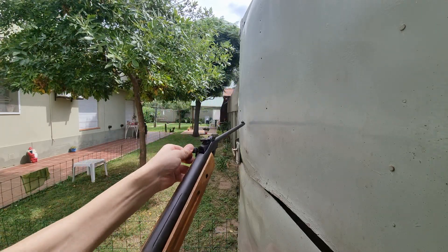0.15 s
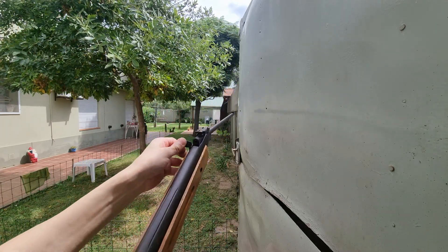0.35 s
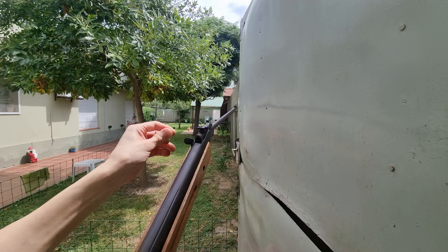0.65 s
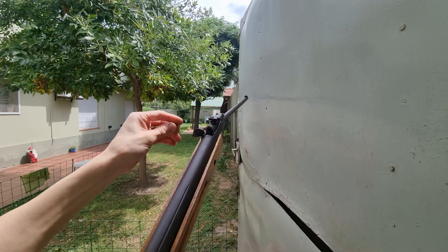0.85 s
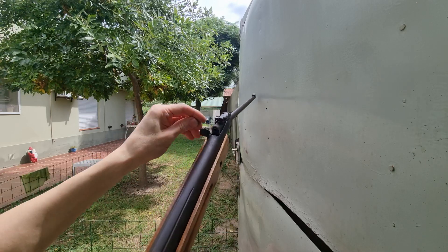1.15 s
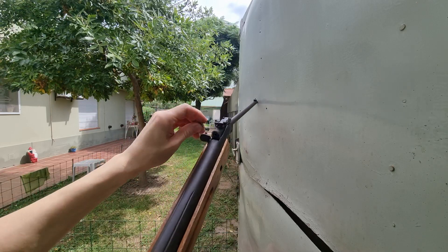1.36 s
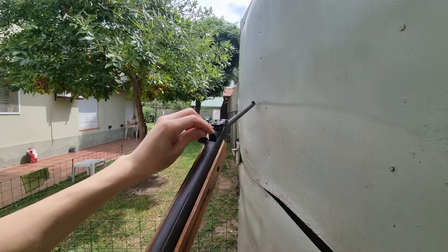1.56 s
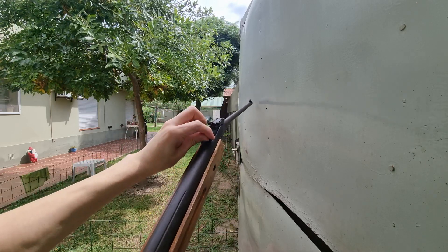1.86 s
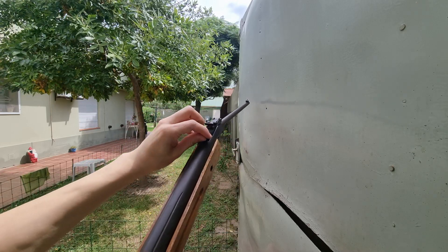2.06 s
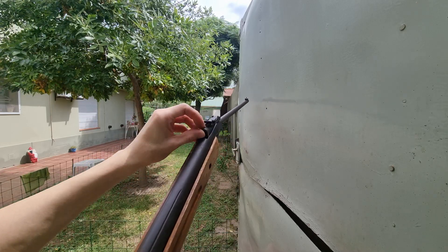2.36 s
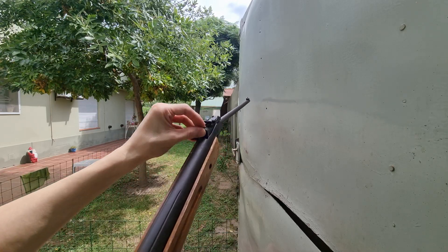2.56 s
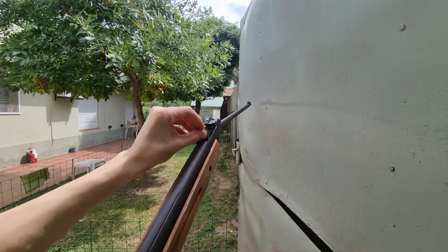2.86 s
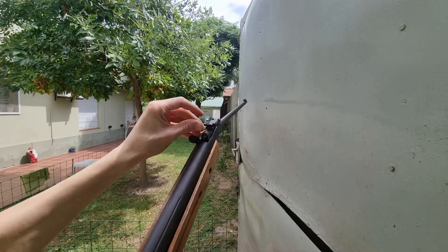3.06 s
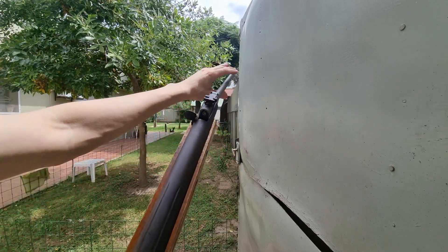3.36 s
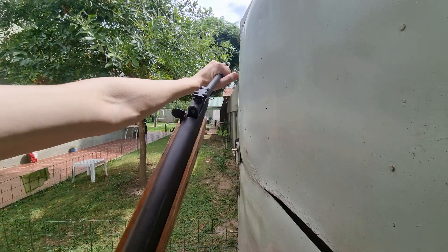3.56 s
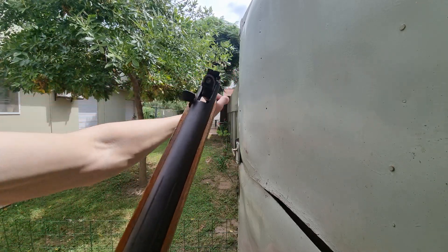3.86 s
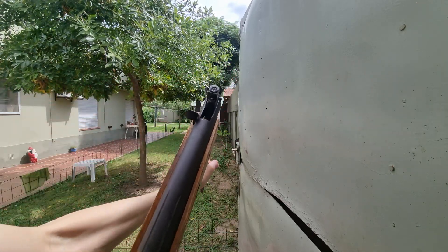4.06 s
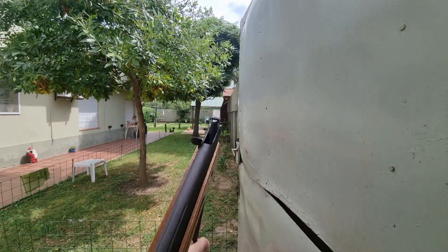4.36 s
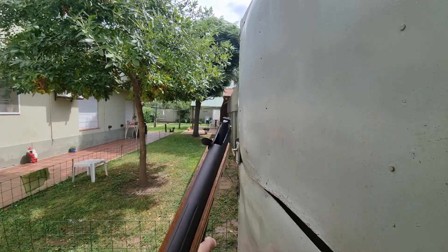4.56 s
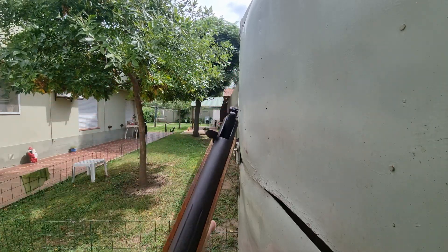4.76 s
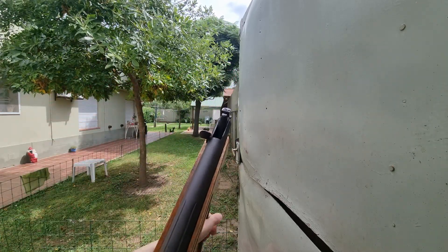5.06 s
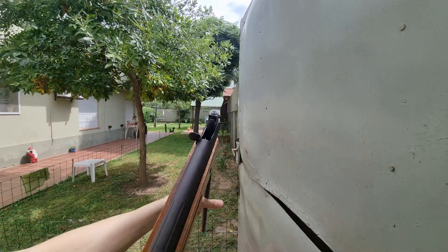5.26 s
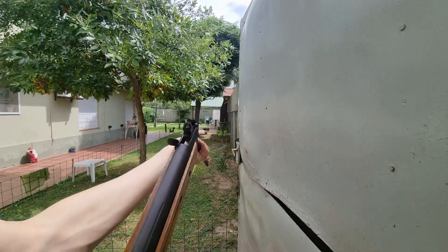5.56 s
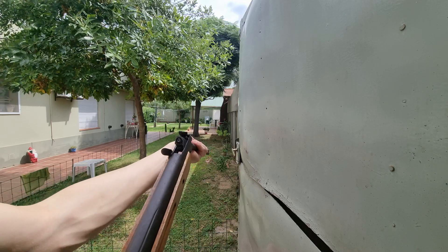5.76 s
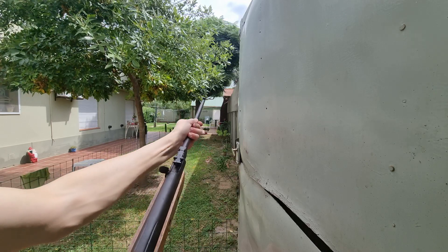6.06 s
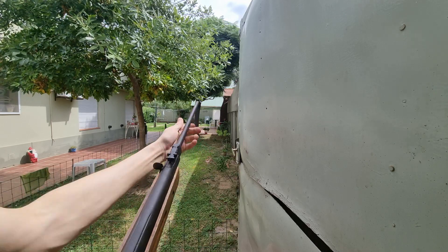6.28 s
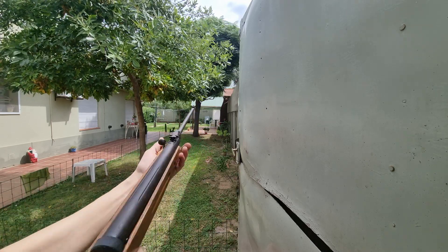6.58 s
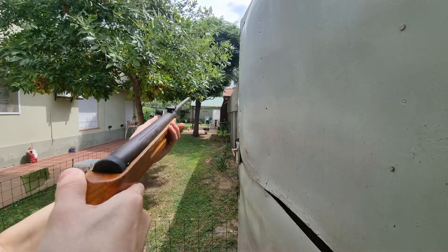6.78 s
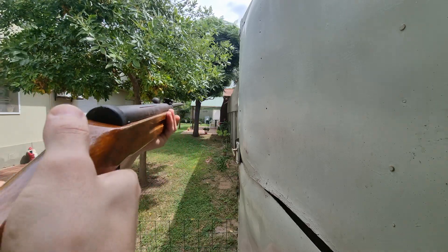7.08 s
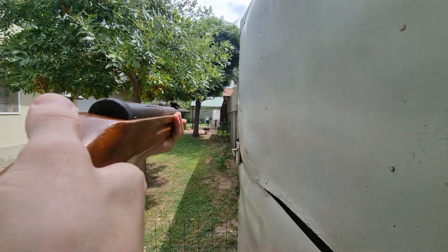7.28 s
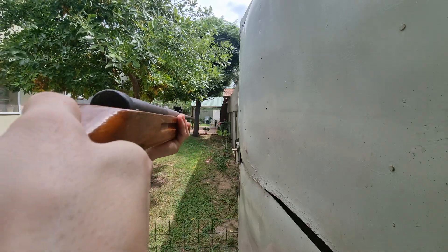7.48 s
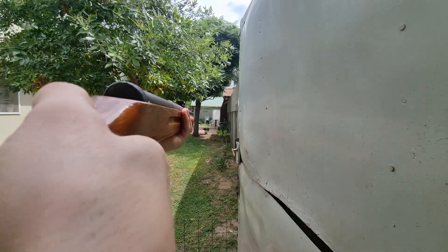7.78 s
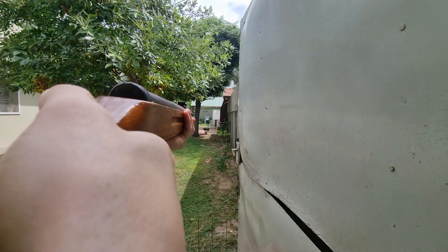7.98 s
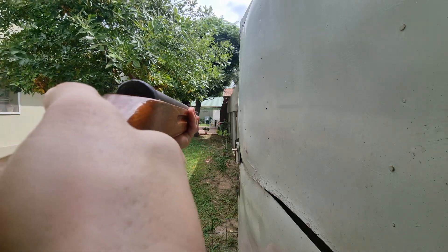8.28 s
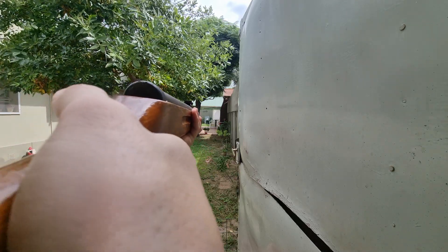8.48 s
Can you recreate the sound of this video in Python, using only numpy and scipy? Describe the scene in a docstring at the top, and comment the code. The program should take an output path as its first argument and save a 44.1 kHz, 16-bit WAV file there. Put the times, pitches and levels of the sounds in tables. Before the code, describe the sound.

A break-barrel air rifle clicks, creaks and snaps shut with a loud steel clack in a garden, where buzzing cicadas die away and birds call.

```python
"""Cicadas, two trains of tymbal clicks, buzz in a garden over open air and a low rumble of far traffic.
A break-barrel air rifle clicks as noise cracks with steel modes; a hollow sheet wall on the right booms.
Far hoarse calls and a dove's coos come in; after the buzz dies, the cocking linkage creaks in small slips,
a far engine hums and small birds whistle. The barrel snaps shut with a steel clack; palms brush the stock."""
import sys
import numpy as np
from scipy import signal
from scipy.fft import rfft, irfft, next_fast_len
from scipy.io import wavfile
from scipy.ndimage import uniform_filter1d

SR = 44100
rng = np.random.default_rng(int(sys.argv[2]) if len(sys.argv) > 2 else 0)


def store_wav(level_fs):
    """Save 16-bit WAV to argv[1]."""
    pcm = np.round(np.clip(np.atleast_2d(level_fs), -1, 1) * 32767)
    wavfile.write(sys.argv[1], SR, pcm.T.astype(np.int16))


N = 380583
TIME = np.arange(N) / SR


def undb(db):
    """Turn dB into an amplitude factor."""
    return 10 ** (np.asarray(db) / 20)


def unit(x):
    """Scale to rms 1."""
    return x / np.sqrt(np.mean(x ** 2) + 1e-30)


def lookup(hz, points):
    """Read (Hz, value) points on a log-frequency axis."""
    f, value = np.transpose(points)
    return np.interp(np.log(hz + 0.001), np.log(f), value)


def colour(x, points):
    """Give a steady sound a (Hz, dB) spectrum."""
    n = next_fast_len(len(x))
    gain = undb(lookup(np.fft.rfftfreq(n, 1 / SR), points))
    return irfft(rfft(x, n) * gain, n)[:len(x)]


def band(x, lo_hz, hi_hz, order=2):
    """Band-pass with a Butterworth filter."""
    edges_hz = [lo_hz, min(hi_hz, SR / 2 - 100)]
    return signal.sosfilt(signal.butter(order, edges_hz, "band", fs=SR, output="sos"), x)


def noise(n=N):
    """White noise of rms 1."""
    return rng.standard_normal(n)


def fade(t, t60_s):
    """Exponential decay, 60 dB in t60_s."""
    return np.exp(-np.log(1000) * t / max(t60_s, 1e-3))


def walk(rate_hz):
    """Smooth chance with a spread of 1."""
    k = int(SR / rate_hz)
    steps = np.repeat(noise(N // k + 1), k)
    return unit(uniform_filter1d(steps, k)[:N])


def swell(peak_s, rise_s, fall_s, db):
    """Gain that climbs 20 dB during the rise and sinks 20 dB during the fall."""
    before = (peak_s - TIME) / max(rise_s, .005)
    after = (TIME - peak_s) / max(fall_s, .005)
    return undb(db - 20 * np.maximum(before, after))


def ring(t, modes, length=1):
    """Decaying modes, each struck with a random sign; length scales every t60."""
    out = 0
    for hz, db, t60_s in modes:
        mode = np.sin(2 * np.pi * hz * t) * fade(t, length * min(t60_s, 1.3))
        out = out + rng.choice([-1, 1]) * undb(db) * mode
    return out


def add(out, s, x):
    """Mix x into out from second s on."""
    i = max(int(s * SR), 0)
    out[i:i + len(x)] += x[:len(out) - i]


def on_right(x, left_db):
    """The left port is shaded from the source."""
    return np.array([undb(left_db) * x, x])


def yard(x, t60_s, wet_db):
    """Scatter from walls and leaves; the middle treble lingers longest."""
    t = np.arange(SR) / SR
    tail = band(noise(SR), 300, 15000) * fade(t, 0.53 * t60_s)
    tail += undb(-10) * band(noise(SR), 2800, 7800) * fade(t, t60_s)
    tail *= 1 - np.exp(-t / 0.0024)
    return undb(wet_db) * signal.fftconvolve(x, tail / np.linalg.norm(tail))[:N]


def tymbal_clicks(rate_hz, scatter_ms):
    """A train of sharp clicks whose timing loosens as the song goes on."""
    cycles = np.cumsum(rate_hz) / SR
    at = np.interp(np.arange(2, int(cycles[-1])), cycles, np.arange(N))
    at += noise(len(at)) * scatter_ms[at.astype(int)] * SR / 1000
    # sinc taps place each click between samples
    taps = at.astype(int)[:, None] + np.arange(-7, 9)
    out = np.zeros(N)
    np.add.at(out, np.clip(taps, 0, N - 1), np.sinc(taps - at[:, None]))
    return unit(out)


SONG_DB, SONG_SWELL_DB, SONG_SWELL_S = -54.5, 3, 1.2  # starts 3 dB low, full after 1.2 s
# release begins at SONG_FADES_AT_S; the body's release adds to the song's
SONG_FADES_AT_S, SONG_RELEASE_DB_PER_S, BODY_EXTRA_RELEASE_DB_PER_S = 3.56, 52, 60
STEADY_HZ, RATE_WANDER, SHIMMER_DB = 317.4, .0014, 2.0  # wander as a share of the rate
SCATTER_START_MS, SCATTER_DOUBLES_S = 0.009, 0.8
# click rate of the easing singer: (time [s], rate [clicks/s])
EASING_RATE = [(0, 341), (.65, 339), (1, 333), (1.5, 328), (3.6, 329)]
# abdomen resonances: (centre [Hz], width [Hz], level [dB])
TYMBAL_MODES = [(3110, 370, 3.5), (4574, 400, 10), (5540, 370, 7.5), (6960, 260, -12)]
# partials that stand out: (singer [0 steady, 1 easing], multiple of click rate [-], level [dB])
WHINE_PARTIALS = [(0, 5, -24), (0, 6, -20), (0, 7, -25), (0, 10, -6), (0, 11, -11), (0, 12, -7),
                  (1, 6, -22), (1, 10, -11), (1, 13, -7), (1, 14, -10)]
# buzz spectrum: (frequency [Hz], level [dB])
BUZZ_SPECTRUM = [(1350, -41), (2300, -24.5), (2410, -70), (2720, -71), (3000, -5), (3070, -3), (3640, -9.5),
                 (4050, -2), (4530, 8.5), (5150, -8.5), (6200, 2), (6670, -15.5), (7400, -9), (8420, -18.5),
                 (10500, -13.5), (11600, -9.5), (15800, -19.5)]
# higher note that ends the song: (peak time [s], rise [s], fall [s], level [dB])
LAST_NOTE = (3.68, .3, .2, -60)
# its band: (low edge [Hz], high edge [Hz])
LAST_NOTE_BAND = (4750, 5700)


def cicadas():
    """Two click trains ring the insects' bodies; foliage smears the clicks into a whining hiss."""
    bases_hz = STEADY_HZ, np.interp(TIME, *np.transpose(EASING_RATE))
    rates_hz = [hz * (1 + RATE_WANDER * walk(6)) for hz in bases_hz]
    scatter_ms = SCATTER_START_MS * 2 ** (np.minimum(TIME, SONG_FADES_AT_S) / SCATTER_DOUBLES_S)
    dying_s = np.maximum(TIME - SONG_FADES_AT_S, 0)
    steady, easing = (tymbal_clicks(hz, scatter_ms) for hz in rates_hz)
    # the easing singer stresses every third click
    easing = easing + tymbal_clicks(rates_hz[1] / 3, scatter_ms)
    steady = band(yard(steady, t60_s=.12, wet_db=3), 2500, 4000, order=4)
    easing = band(yard(easing, t60_s=.2, wet_db=0), 3300, 16000, order=2)
    # smeared clicks, 50 ms early, over a hiss
    drive = np.roll(unit(steady + .6 * easing), -SR // 20) + undb(-9) * noise()

    # the abdomen's resonances give out before the rest of the song
    body = 0
    for hz, width_hz, db in TYMBAL_MODES:
        mode = band(drive, hz - width_hz / 2, hz + width_hz / 2, order=1)
        body = body + undb(db + SHIMMER_DB * walk(14)) * mode
    body = unit(band(body, 3080, 6520, order=4)) * undb(-1.5 - BODY_EXTRA_RELEASE_DB_PER_S * dying_s)

    # partials sing out while the clicks are evenly timed
    whine = 0
    for singer, multiple, db in WHINE_PARTIALS:
        hz = multiple * rates_hz[singer]
        tone = np.sin(2 * np.pi * np.cumsum(hz + 5 * walk(30)) / SR)
        evenness = np.exp(-(2 * np.pi * hz * scatter_ms / 1000) ** 2 / 2)
        whine = whine + tone * evenness * undb(db + 2.5 * walk(5))

    buzz = unit(colour(drive, BUZZ_SPECTRUM)) * undb(4.5)
    level_db = SONG_DB - SONG_SWELL_DB * np.maximum(1 - TIME / SONG_SWELL_S, 0)
    level_db = level_db - SONG_RELEASE_DB_PER_S * dying_s + 0.46 * walk(25.45)
    song = (body + whine + buzz) * undb(level_db)
    song = song + unit(band(drive, *LAST_NOTE_BAND)) * swell(*LAST_NOTE)
    return np.array([undb(-15.0) * band(song, 5040, 6600), song])


AIR_DB = -57  # rms before the balance between ports
# open-air spectrum: (frequency [Hz], level [dB])
AIR_SPECTRUM = [(15, -30.5), (25, -7), (102, -0.5), (152, -1), (235, -7.5), (371, -10.5), (414, -12),
                (981, -22.5), (1180, -21.5), (2090, -30), (3130, -29), (5820, -40.5), (8970, -48.5),
                (12700, -44), (15800, -44.5)]
# balance between ports: (frequency [Hz], left minus right [dB])
AIR_PORT_BALANCE = [(60, -4), (110, -0.5), (200, 7), (380, 6), (700, 11), (1290, 8), (2380, 0),
                    (4400, -8.5), (8120, -23.5), (15000, -11.5)]


def open_air():
    """Coloured noise, unrelated at the two ports, gently unsteady."""
    level = undb(AIR_DB) / np.std(colour(noise(), AIR_SPECTRUM))
    ports = []
    for side in (1, -1):
        # split the power between the ports
        share = [(hz, 20 * np.log10(np.sqrt(2 / (1 + undb(-2 * side * db))))) for hz, db in AIR_PORT_BALANCE]
        air = colour(colour(noise(), AIR_SPECTRUM), share)
        ports.append(level * air * undb(1.1 * walk(4)))
    return np.array(ports)


TRAFFIC_HALF_WIDTH = .12  # share of the pitch
# rumbles that rise and ebb: (peak time [s], rise [s], fall [s], pitch [Hz], level [dB])
TRAFFIC_RUMBLES = [(1, .9, 1.33, 63.8, -54), (3.25, 0.38, 0.29, 115, -55.5), (5.1, 0.45, 0.47, 53.7, -57),
                   (6.45, 0.49, 0.7, 54.5, -55.5), (7.55, 0.95, 0.66, 52.8, -53)]


def traffic():
    """Far traffic: narrow bands of low noise that swell and ebb."""
    out = np.zeros(N)
    for s, rise_s, fall_s, hz, db in TRAFFIC_RUMBLES:
        rumble = unit(band(noise(), hz * (1 - TRAFFIC_HALF_WIDTH), hz * (1 + TRAFFIC_HALF_WIDTH)))
        out += rumble * swell(s, rise_s, fall_s, db)
    return out


CLICK_LEFT_DB = -23  # left minus right, before scatter
# steel contacts: (time [s], level [dB, before -4 dB], low band re middle [dB],
# high band re middle [dB], ring t60 [s])
STEEL_CONTACTS = [(0.0845, -38.5, -1, -5.5, 0.18), (0.136, -27, 7.5, -1.5, 0.052),
                  (0.1576, -46, 17, 11.5, 0.033), (0.179, -33.5, 6.5, -5, 0.022), (0.196, -45, 11, 1, 0.24),
                  (2.73, -70, -5, 18, 0.05), (3.8351, -59.5, 15, -0.5, 0.05),
                  (4.0105, -50.5, 13, -1, 0.016), (4.137, -75, -7, 16, 0.05), (4.364, -42, 3.5, -19, 0.11),
                  (4.4193, -33, -1.5, 2, 0.031), (4.457, -39.5, 7, 0.5, 0.026), (4.793, -44, 7, -4, 0.023),
                  (5.156, -65, 8, 12, 0.035), (5.2658, -50, -2, -7, 0.074), (5.4, -48.5, 5, -0.5, 0.054),
                  (5.412, -49, 2, -14, 0.098), (5.876, -45.5, 4, -30, 0.053),
                  (5.922, -32, -1, -10.5, 0.037), (5.9571, -32.5, 2.5, -6, 0.056),
                  (6.0137, -12, -4, 2, 0.03), (6.0201, -21, 1.5, 4.5, 0.13), (6.555, -61, 12, -7, 0.04),
                  (6.6309, -48, -1, -14, 0.086), (7.514, -50, -15.5, -28, 0.011)]
# barrel and action modes: (frequency [Hz], level [dB], t60 [s, for a contact of t60 0.24 s])
STEEL_MODES = [(829, -15.5, 0.18), (1090, -6, .15), (1400, -12, 0.18), (1520, -13, 0.2216),
               (1657, -6.5, .18), (2440, -14.5, 0.22), (3135, -10, 0.74), (3230, -18.5, 0.19),
               (3660, -15, 0.58), (4450, -10.5, 0.13), (4610, -17, 0.14), (5317, -11, .16),
               (5660, -8, 0.11), (6850, -7, 0.091), (8380, -9, 0.22), (10500, -11.5, .25),
               (10173, -5.5, 0.36), (11840, -7.5, 0.26), (12550, -6.5, 0.37), (13890, -2.5, 0.28)]
# crack spectrum: (frequency [Hz], level [dB])
STEEL_SPECTRUM = [(400, -16.5), (700, -3), (1000, -7), (1400, 2.5), (2100, -6.5), (2700, -1), (3600, -2.5),
                  (4600, -7), (7200, -1.5), (8600, -3.5), (11300, -7), (12400, -2), (15800, -13.5)]
# light contacts ring only the small parts, hard ones the whole barrel: (level [dB], lowest frequency [Hz])
CONTACT_REACH = [(-42, 1100), (-22, 450)]


def action():
    """Each contact is a hard crack, then the ring of barrel and action, scattered by the garden."""
    out, t, head = np.zeros((2, N)), np.arange(SR // 3) / SR, SR // 200
    for s, db, low_db, high_db, t60_s in STEEL_CONTACTS:
        crack = unit(colour(noise(len(t)), STEEL_SPECTRUM)) * (fade(t, t60_s) + 0.62 * fade(t, 0.045))
        steel = ring(t, STEEL_MODES, length=t60_s / 0.24)
        x = crack + undb(-5) * steel / np.std(steel[:head])
        low = band(x, np.interp(db, *np.transpose(CONTACT_REACH)), 2436)
        middle, high = band(x, 3225, 5160), band(x, 5000, 16000)
        hit = 0
        # alternate signs keep neighbouring bands from cancelling where they meet
        for sign, gain_db, part in ((1, low_db, low), (-1, 0, middle), (1, high_db, high)):
            hit = hit + sign * undb(db + gain_db - 4.0) * part / np.std(part[:head])
        add(out[0], s, undb(CLICK_LEFT_DB) * hit)
        add(out[1], s, hit)
    # each port hears its own scatter
    left = out[0] + yard(out[0], t60_s=0.24, wet_db=-8.5)
    right = out[1] + yard(out[1], t60_s=0.46, wet_db=-13.5)
    # the shaded left port loses the top octave
    return np.array([colour(left, [(3000, 1.5), (5500, 5), (7700, 5), (8600, -9)]), right])


# bumps: (time [s], level [dB, relative], share of full ring [-], panel modes re crowd [dB],
# favoured pitch [Hz], left minus right [dB], contact time [s])
WALL_BUMPS = [(0.137, -12.5, 0.95, -4, 385, -24, 0.0003), (0.226, -28.5, 0.79, -0.5, 89, -25, 0.0065),
              (0.384, -42.5, 0.7, 2.5, 310, -20, 0.011), (0.42, -52.5, 0.52, -7, 715, -24, 0.0081),
              (1.361, -39.5, 0.87, -4, 250, -21, 0.001), (6.015, -49.5, 0.29, -16.5, 261.3, -7, 0.00098),
              (6.643, -46, 0.091, -14, 301, -15, 0.0013)]
# strong panel modes: (frequency [Hz], level [dB], t60 at full ring [s])
WALL_MODES = [(70, 7, 0.6), (94.3, -2, 1.3), (116, -7.5, 1.1), (141, -2, 0.5), (231, 2, 0.5),
              (305, 0, 0.42), (359, 9, 0.23), (462, 0, 0.25), (539, -3, 0.28), (686, -2, 0.28),
              (917, -9, 0.22)]
# spectrum of the weak modes: (frequency [Hz], level [dB])
WALL_SPECTRUM = [(18, -35), (30, -11), (90, 0), (164, -3.5), (227, -7.5), (367, -8.5), (749, -13.5),
                 (891, -15.5), (1340, -29.5), (2340, -40.5), (3000, -34), (3900, -76.5), (6600, -120)]
# decay of the weak modes: (frequency [Hz], t60 at full ring [s])
WALL_DECAY = [(40, 1.2), (120, 1.15), (300, 0.46), (700, 0.33), (1500, 0.16)]


def wall():
    """A big loose panel: a few strong modes in a crowd of weak ones, whose deepest last longest."""
    out, t, head = np.zeros((2, N)), np.arange(SR) / SR, SR // 40
    centres_hz = 35 * 2 ** (np.arange(14) / 2)
    for s, db, length, modes_db, favoured_hz, pan_db, contact_s in WALL_BUMPS:
        crowd = 0
        for hz in centres_hz:
            # half an octave of noise, past the filter's start-up
            weak = unit(band(noise(SR + head * 8), hz / 2 ** (1 / 4), hz * 2 ** (1 / 4)))[-SR:]
            level = np.sqrt(hz) * undb(lookup(hz, WALL_SPECTRUM))
            crowd = crowd + weak * level * fade(t, length * lookup(hz, WALL_DECAY))
        modes = ring(t, WALL_MODES, length)
        boom = crowd / np.std(crowd[:head]) + undb(modes_db) * modes / np.std(modes[:head])
        # the place of the blow favours some modes
        boom = boom + 1.5 * band(boom, .85 * favoured_hz, 1.15 * favoured_hz, order=1)
        boom *= undb(db - 2.5) * (1 + 0.79 * fade(t, 0.053))
        boom *= 1 - np.exp(-(t / contact_s) ** 2)
        add(out[0], s, undb(pan_db) * boom)
        add(out[1], s, boom)
    return out


def whistle(length_s, start_hz, end_hz, warble, arch_hz=0):
    """One gliding note with a burr, rounded at both ends."""
    u = np.linspace(0, 1, int(length_s * SR))
    hz = start_hz + (end_hz - start_hz) * u + arch_hz * np.sin(np.pi * u)
    hz = hz * (1 + warble * walk(300)[:len(u)])
    return np.sin(2 * np.pi * np.cumsum(hz) / SR) * 2 * np.sqrt(u * (1 - u))


CHIRP_BURR, BURR_FULL_S = 0.035, 0.1  # wobble as a share of the pitch; shorter notes are purer
COO_HZ, COO_WARBLE, COO_ARCH_HZ = 370, 0.011, 12.43  # warble as a share of the pitch
LEAVES_T60_S, BIRD_DIRECT_DB = .09, -5
# a far bird's hoarse calls: (time [s], length [s], level before scatter [dB])
HOARSE_CALLS = [(0.665, 0.11, -68), (1.885, 0.12, -69), (3.13, 0.09, -71), (3.38, 0.16, -68.5)]
# their spectrum: (frequency [Hz], level [dB])
HOARSE_SPECTRUM = [(1350, -27), (1600, -7), (1820, -1), (1970, -6), (2100, -5), (2500, -30.5)]
# the dove's coos: (time [s], length [s], level [dB])
DOVE_COOS = [(1.603, 0.48, -63), (2.598, 0.36, -65), (7.046, 0.693, -60.5), (8.219, 0.48, -57.5)]
# small birds: (time [s], length [s], start [Hz], end [Hz], mid arch [Hz], level before scatter [dB])
BIRD_CHIRPS = [(4.667, 0.17, 3140, 3250, 132.5, -60), (5.131, 0.038, 3204, 3410, 224, -54),
               (5.19, 0.074, 3340, 3280, 105, -59.5), (6.375, 0.052, 3095, 3114, 304.5, -61.5),
               (6.442, 0.065, 3110, 3030, 202.5, -60), (7.077, 0.03, 3360, 3040, 125.5, -61.5),
               (7.205, 0.045, 3000, 2554, 60.5, -66), (7.283, 0.093, 2900, 2830, 36.5, -66),
               (7.419, 0.024, 3284, 2760, 172, -57.5), (7.479, 0.02, 3130, 2550, 99, -59.5),
               (7.557, 0.027, 3370, 2930, 149, -55.5), (7.604, 0.026, 3300, 2760, 103.5, -60.5),
               (7.687, 0.135, 2890, 2863, 451.5, -58.5), (8.152, 0.031, 3053, 3060, 291.5, -50.5),
               (8.184, 0.066, 3120, 1934, -110, -63.5), (8.328, 0.035, 4140, 4110, 19.5, -69),
               (8.427, 0.025, 2920, 2460, 90, -63.5), (8.485, 0.024, 2914, 2660, 120, -64.5),
               (8.541, .03, 2990, 2770, 61, -68.5)]


def birds():
    """Hoarse noise calls and far whistles scattered by the trees, and the dove's low coos."""
    calls, coos = np.zeros((2, N))
    for s, length_s, db in HOARSE_CALLS:
        n = int(length_s * SR)
        rasp = unit(colour(noise(n), HOARSE_SPECTRUM) * np.sqrt(np.hanning(n)))
        add(calls, s, undb(db) * rasp)
    for s, length_s, db in DOVE_COOS:
        add(coos, s, undb(db) * whistle(length_s, COO_HZ, COO_HZ, COO_WARBLE, COO_ARCH_HZ))
    for s, length_s, start_hz, end_hz, arch_hz, db in BIRD_CHIRPS:
        burr = CHIRP_BURR * min(length_s / BURR_FULL_S, 1)
        add(calls, s, undb(db) * whistle(length_s, start_hz, end_hz, burr, arch_hz))
    near = undb(BIRD_DIRECT_DB) * calls + yard(calls, t60_s=LEAVES_T60_S, wet_db=-1.5)
    scattered = near + yard(calls, t60_s=0.62, wet_db=-2.5)
    return on_right(coos + scattered, left_db=-35)


def friction(strokes, spectrum, slips_per_s, scatter_db, grain_share, judder_db):
    """Tiny slips of uneven size, each ringing briefly, over a juddering rub that swells with each stroke."""
    sizes = undb(scatter_db * np.minimum(rng.exponential(size=N), 3))
    slips = (rng.random(N) < slips_per_s / SR) * sizes
    t = np.arange(SR // 20) / SR
    slips = signal.fftconvolve(slips, noise(len(t)) * fade(t, 0.024))[:N]
    effort = np.max([swell(*stroke) for stroke in strokes], axis=0)
    rub = unit(colour(grain_share * unit(slips) + noise(), spectrum))
    return rub * effort * undb(judder_db * walk(45))


# linkage under the spring's load: (peak time [s], rise [s], fall [s], level before +5.5 dB [dB])
LINKAGE_STROKES = [(3.95, 0.19, 0.72, -67.5), (4.09, 0.37, 0.57, -65.5), (4.395, 0.089, 0.1, -55.5),
                   (5.25, 0.25, .2, -67), (5.42, 0.27, 0.32, -63), (5.89, 0.17, 0.047, -57.5),
                   (6.01, 0.025, 0.049, -46.5)]
# creak spectrum: (frequency [Hz], level [dB])
CREAK_SPECTRUM = [(350, -38.5), (650, -5), (950, -17.5), (1220, -0.5), (1500, -5), (1950, -6),
                  (2700, -14.5), (3800, -13), (5500, -17), (9000, -21), (15000, -30.5)]


def linkage():
    """The cocking linkage grates under the spring's load."""
    return undb(5.5) * friction(LINKAGE_STROKES, CREAK_SPECTRUM, slips_per_s=260, scatter_db=3,
                                grain_share=1, judder_db=2.6)


ENGINE_WANDER, ENGINE_FLUTTER_DB = .02, 1.5  # wander as a share of the rate
# engine slowly gathering speed: (time [s], firing rate [Hz], level [dB])
ENGINE_RUN = [(3.85, 87, -73), (4.2, 88, -46.5), (4.6, 92, -54), (4.82, 95, -65), (5.05, 98, -50),
              (5.3, 99, -63.5), (6.4, 103, -55), (7.4, 109, -71.5)]


def engine():
    """A wavering hum on the firing rate of a far engine."""
    s, hz, db = np.transpose(ENGINE_RUN)
    rate_hz = np.interp(TIME, s, hz) * (1 + ENGINE_WANDER * walk(17))
    level_db = np.interp(TIME, s, db, left=-120, right=-120) + ENGINE_FLUTTER_DB * walk(12)
    return unit(np.sin(2 * np.pi * np.cumsum(rate_hz) / SR)) * undb(level_db)


SLIPS_PER_S, SLIP_SCATTER_DB = 420, 4
# loaded hinge sticks and jerks free: (time [s], length [s], pitch [Hz], level [dB])
HINGE_JERKS = [(3.884, 0.04, 1400, -59.5), (3.953, 0.021, 1400, -59), (4.015, 0.026, 1330, -51),
               (4.062, 0.021, 1370, -51), (4.098, 0.011, 1560, -60), (4.153, 0.027, 1380, -61),
               (4.218, .016, 1400, -57.5), (5.075, 0.012, 1680, -62.5), (5.367, 0.028, 1600, -53.5),
               (5.433, 0.035, 1560, -53.5), (5.491, 0.028, 1840, -60.5), (5.874, 0.032, 1630, -52)]
# hinge resonances: (multiple of pitch [-], width as a share [-], level [dB])
HINGE_MODES = [(1, 0.085, 4), (1.37, 0.055, -14), (2.3, .4, -18)]


def hinge():
    """Each jerk is a quick run of uneven slips that ring the hinge's resonances."""
    out = np.zeros(N)
    for s, length_s, hz, db in HINGE_JERKS:
        n = int(length_s * SR)
        at = np.cumsum(rng.uniform(.5, 1.5, 64)) * SR / SLIPS_PER_S
        at = (at - at[0]).astype(int)
        slips = np.zeros(n + SR // 20)
        slips[at[at < n]] = undb(SLIP_SCATTER_DB * noise(len(at)))[at < n]
        jerk = 0
        for k, width, gain_db in HINGE_MODES:
            mode = band(slips, k * hz * (1 - width / 2), k * hz * (1 + width / 2), order=1)
            jerk = jerk + undb(gain_db) * unit(mode)
        jerk = band(jerk, 670, 5100)
        add(out, s, undb(db) * jerk / np.std(jerk[:n]))
    return out


# dull low knocks: (time [s], pitch [Hz], level [dB], t60 [s], left minus right [dB])
DULL_KNOCKS = [(4.195, 81, -49, 0.11, 13), (4.457, 770, -45, 0.064, -20), (4.553, 79, -59, 0.17, 25),
               (4.793, 740, -37, 0.047, -14), (5.4, 690, -53, 0.29, -24)]


def dull_knocks():
    """Handling bumps near the left port, low thuds under the clicks: decaying noise around a pitch."""
    out, t = np.zeros((2, N)), np.arange(SR // 2) / SR
    for s, hz, db, t60_s, pan_db in DULL_KNOCKS:
        knock = undb(db) * unit(band(noise(len(t)), hz / 1.4, hz * 1.4)) * fade(t, t60_s)
        add(out[0], s, undb(pan_db) * knock)
        add(out[1], s, knock)
    return out


# steel squeaks as the joint slides: (time [s], length [s], pitch [Hz], level [dB])
JOINT_SQUEAKS = [(5.52, 0.16, 2490, -59.5), (5.956, 0.051, 12050, -33)]


def squeaks():
    """The sliding steel joint squeaks: short tones of unsteady pitch."""
    out = np.zeros(N)
    for s, length_s, hz, db in JOINT_SQUEAKS:
        t = np.arange(int(length_s * SR)) / SR
        phase = 2 * np.pi * np.cumsum(hz * (1 + 0.017 * walk(900)[:len(t)])) / SR
        envelope = np.sqrt(np.sin(np.pi * t / length_s)) * fade(t, 3 * length_s)
        add(out, s, undb(db) * np.sin(phase) * envelope)
    return out


# palms on the stock: (peak time [s], rise [s], fall [s], level before +6.5 dB [dB])
PALM_SLIDES = [(6.55, 0.087, .12, -67.5), (6.63, 0.18, 0.087, -62), (6.84, 0.11, 0.15, -54.5),
               (6.93, 0.081, 0.088, -52.5), (7.52, 0.11, 0.12, -65)]
# slide spectrum: (frequency [Hz], level [dB])
SLIDE_SPECTRUM = [(470, -37), (800, -15), (1110, 2.5), (1320, 0.5), (1440, 1), (2790, -1), (5400, -0.5),
                  (5970, -6.5), (12800, -7), (15800, -7)]


def palms():
    """Palms brush the stock: dense fine slips over a rub."""
    return undb(6.5) * friction(PALM_SLIDES, SLIDE_SPECTRUM, slips_per_s=600, scatter_db=3,
                                grain_share=1.5, judder_db=1.5)


def scene():
    """Sum all sources at the two ports."""
    garden = cicadas() + open_air() + birds() + on_right(traffic() + engine(), left_db=-19.5)
    joint = on_right(linkage() + hinge() + squeaks(), left_db=-25.5)
    handling = joint + dull_knocks() + on_right(palms(), left_db=-27)
    return garden + action() + wall() + handling


TOP_HZ = 15850


def record(dry):
    """The recorder rounds the tallest peaks and cuts the top."""
    rounded = np.tanh(0.68 * dry) / 0.76
    return signal.sosfilt(signal.ellip(10, .2, 80, TOP_HZ, fs=SR, output="sos"), rounded)


dry = scene()
out = record(dry)
store_wav(out)
```